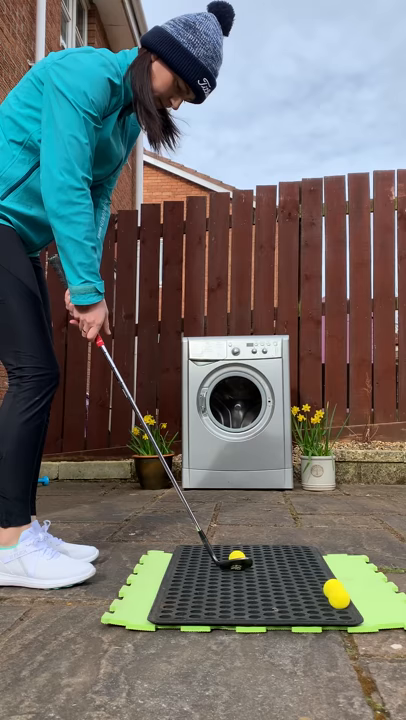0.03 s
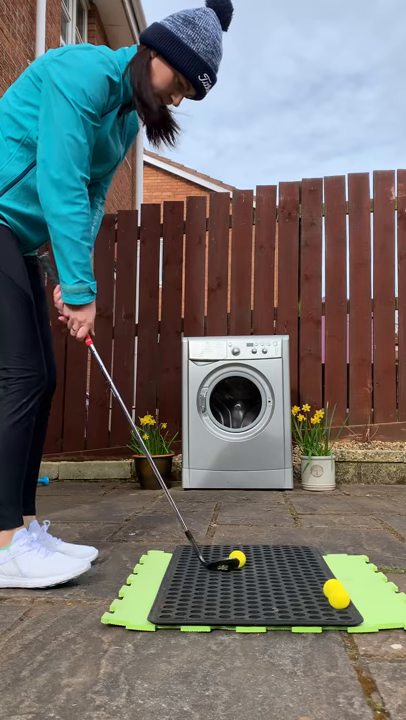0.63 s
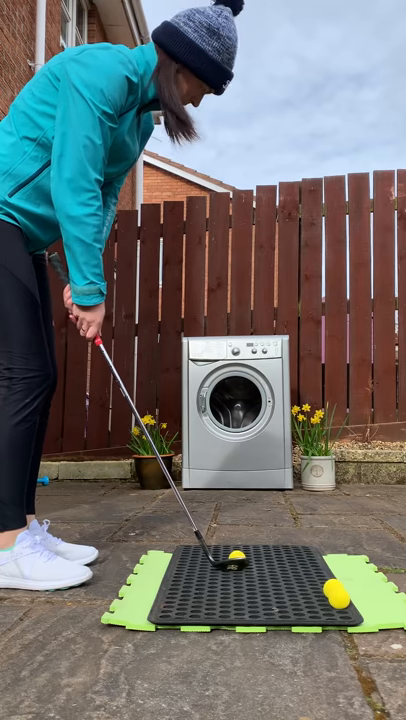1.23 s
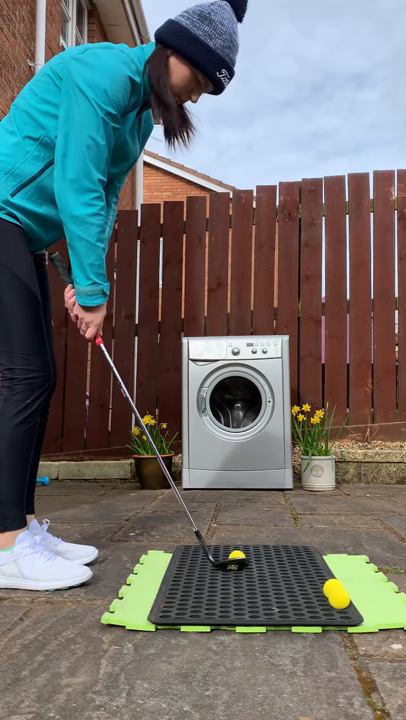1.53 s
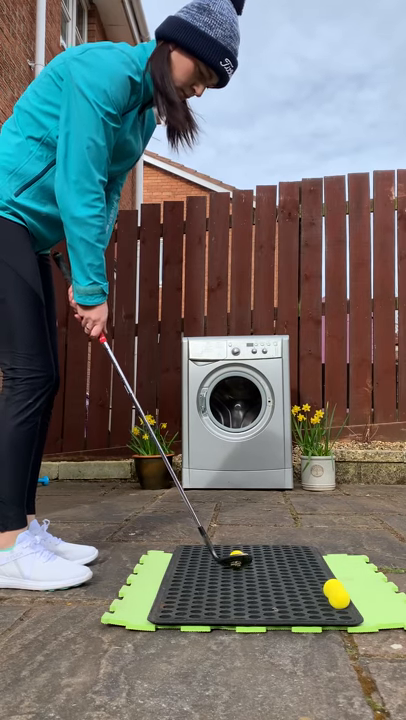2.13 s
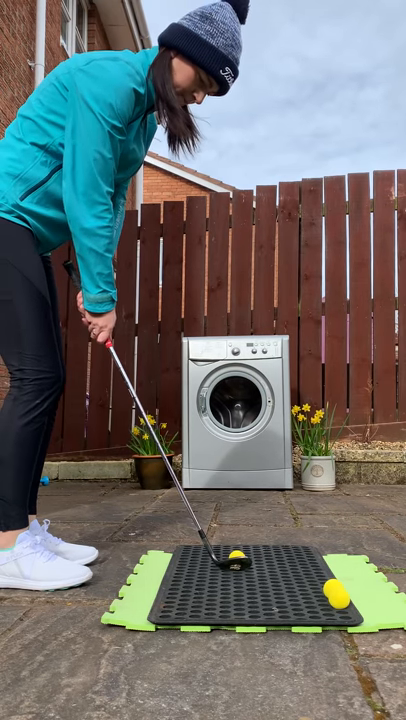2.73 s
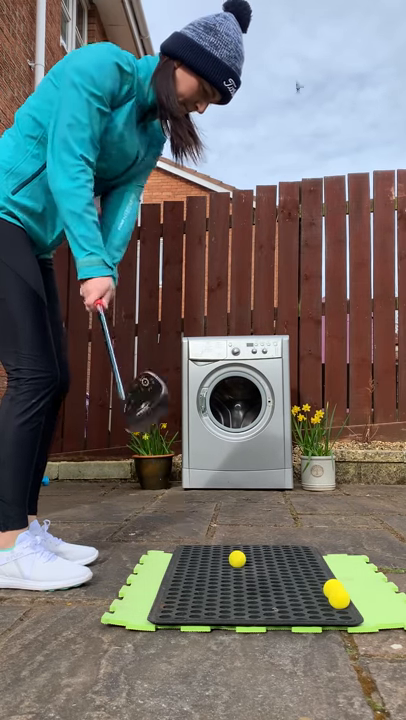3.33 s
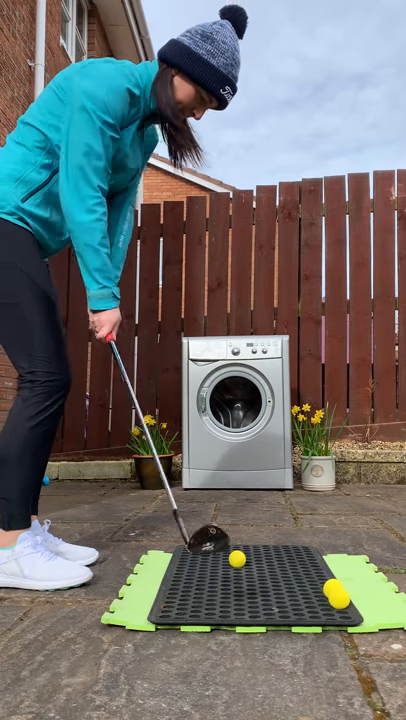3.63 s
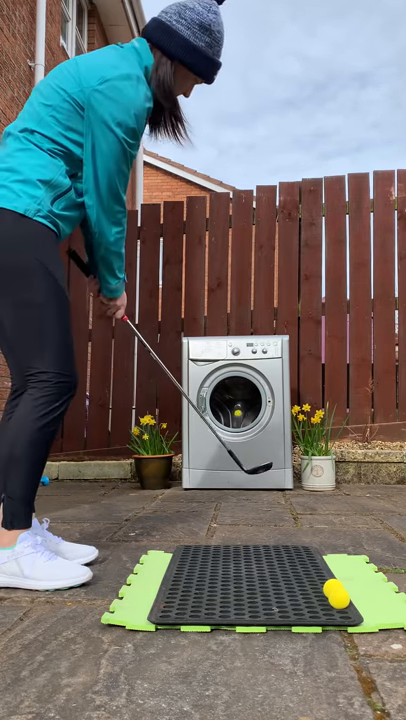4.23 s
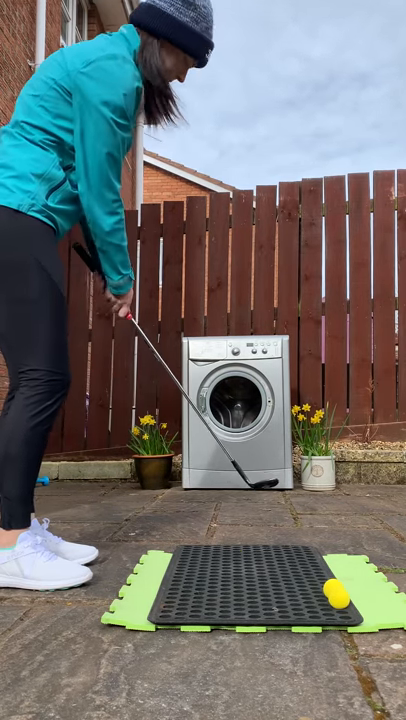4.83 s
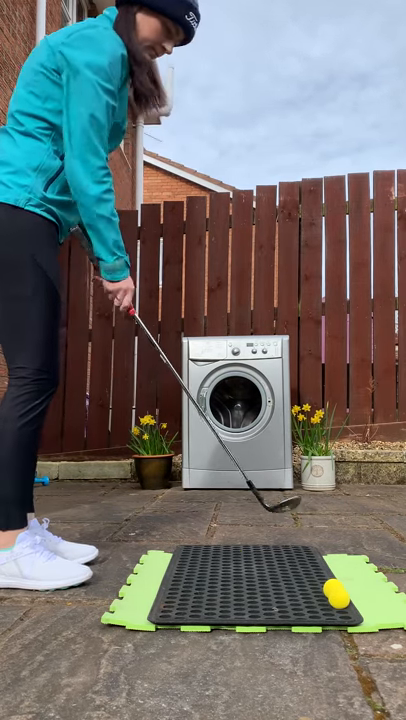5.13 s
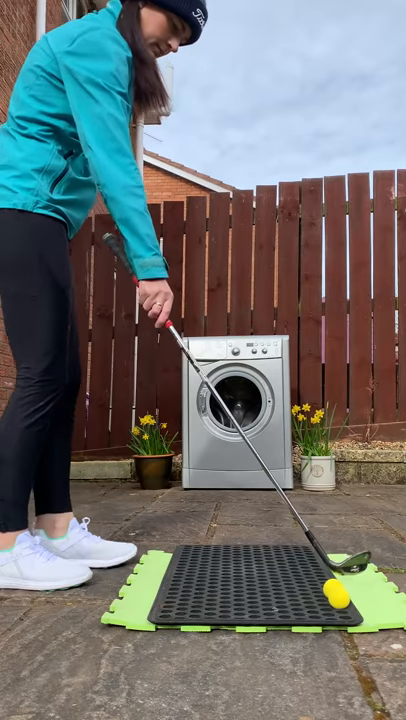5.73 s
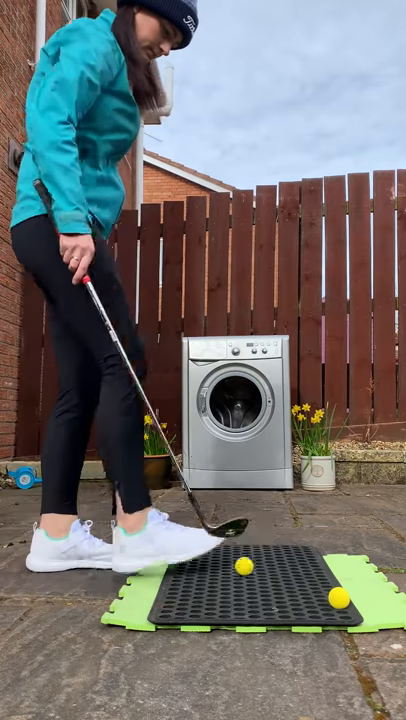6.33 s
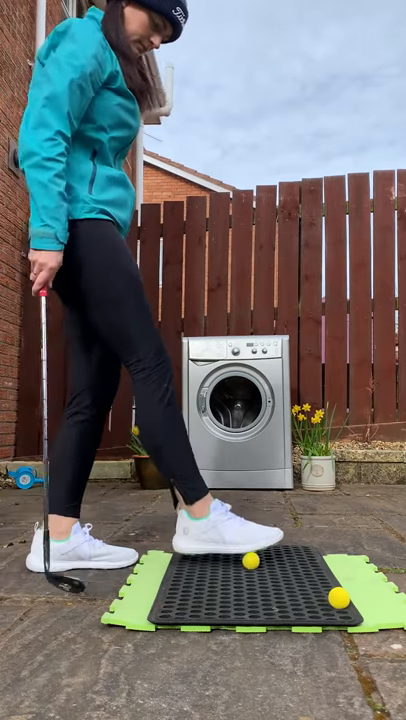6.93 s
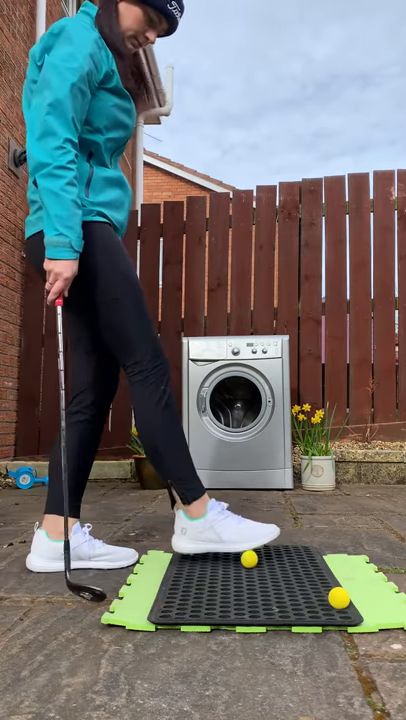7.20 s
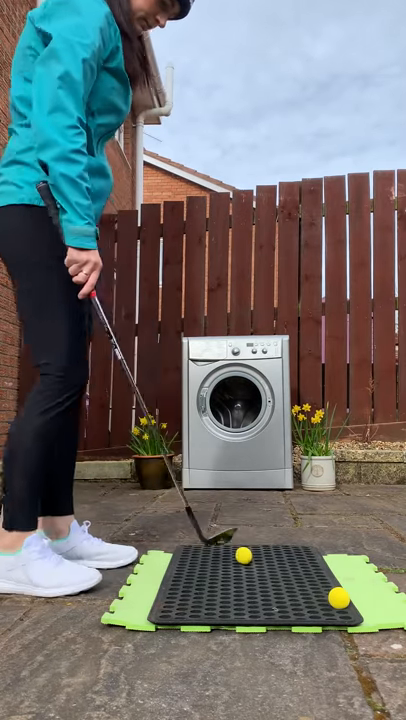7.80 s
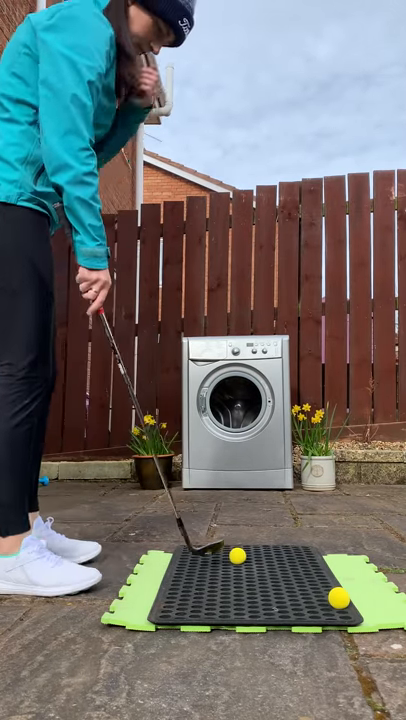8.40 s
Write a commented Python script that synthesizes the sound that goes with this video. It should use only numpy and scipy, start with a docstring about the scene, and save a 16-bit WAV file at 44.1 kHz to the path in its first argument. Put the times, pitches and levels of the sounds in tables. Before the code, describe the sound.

A steady low hum of distant traffic fills a fenced patio. In the first second a golf club taps down softly a few times, and sparrows chirp at about 0.5 and 1.8 seconds, with fainter birds farther off. A jacket swishes from around 3 seconds, and at 3.7 the club hits a ball with a sharp, dead click, followed by another chirp. At 4.3 the ball thuds into a washing machine drum; the steel rings and buzzes as the ball bounces and rattles to rest by about 5.3. Wind buffets the microphone with dull bumps at 5.5, then smaller puffs, and a sparrow chirps again. From 6 to 7.5 seconds come light club taps, faint grit under shoes and a sole rolling a ball over a rubber mat. The club clacks down at 7.7, cloth rustles, and a bird gives a slurred call at 8.5.

```python
"""A distant town hums behind a fenced patio; a golf club taps the ground and sparrows chirp.
A jacket swishes, and with a dead click a ball is chipped off a rubber mat into an open washing machine.
The tub thuds, the steel drum rings and buzzes, and the ball bounces and rattles to rest.
Puffs of wind buffet the microphone as the golfer rolls up another ball underfoot and sets the club down.
Knocks and birdsong scatter off the paving, the house and the fence."""
import sys
import numpy as np
from scipy import signal
from scipy.fft import rfft, irfft, next_fast_len
from scipy.io import wavfile
from scipy.ndimage import map_coordinates

SR = 44100
rng = np.random.default_rng(int(sys.argv[2]) if len(sys.argv) > 2 else 0)


def file_out(sig):
    """Save sig as 16-bit WAV at sys.argv[1]."""
    # one column per channel
    cols = np.atleast_2d(sig).T
    # limit, then scale
    lim = np.clip(cols, -1, 1)
    pcm = np.round(lim * 32767).astype(np.int16)
    wavfile.write(sys.argv[1], SR, pcm)


N = 377496

# The bed of distant traffic. Each row: frequency in Hz, level in dB.
TOWN_SPECTRUM = [(20, -40), (45, 0.5), (70, 2), (110, -1.5), (170, 3.5), (240, -5.5), (330, -16),
                 (600, -20.5), (1400, -20), (1800, -28), (2300, -20.5), (3000, -35), (4000, -38.5),
                 (6000, -45), (15000, -51.5)]
# Yard resonances that colour the hum. Each row: centre in Hz, width in Hz, level in dB.
YARD_RESONANCES = [(753, 20.5, 3), (937, 62, -0.5), (1375, 55, 1), (1546, 110, -4), (2088, 20, 2)]
# The tail off the fence. Each row: frequency in Hz, t60 in seconds.
FENCE_DECAY = [(150, 0.088), (600, 0.4), (2000, 0.73), (5000, 0.32), (14000, 0.022)]

# Chatter from other gardens. Each row: start and length in seconds, first and last pitch in Hz,
# level in dB, warble as a share of pitch.
FAR_CHIRPS = [(1.221, 0.17, 3130, 3000, -65, 0.049), (1.393, 0.21, 2940, 2670, -66.5, .11),
              (1.786, .22, 8640, 7500, -65.5, .03), (2.331, .1, 4170, 2410, -53.5, 0.078),
              (2.37, 0.02, 3950, 3860, -56, 0.0092), (2.482, .11, 3320, 2620, -58.5, .1),
              (2.751, 0.2, 3490, 3795, -55, 0.11), (2.938, 0.028, 3750, 3735, -50, .01),
              (6.559, 0.18, 7450, 7100, -71.5, .03), (6.816, .11, 5960, 5870, -64, .01)]
# One slurred call. Each row: time in seconds, pitch in Hz, level in dB, warble as a share of pitch.
SLUR_CONTOUR = [(8.4, 2950, -60, .04), (8.44, 3800, -52, 0.077), (8.475, 4110, -49, 0.052),
                (8.5, 3630, -50.5, 0.046), (8.53, 3080, -39, .015), (8.555, 3060, -53, .01)]
# Sparrow chirps. Each row: start of the high arch in seconds, its level in dB, pitch factor, then in dB
# against that arch: its overtones, the whistle, the low arch, the rasp, the hoarse voice.
SPARROW_CALLS = [(.457, -47, 1.02, -31, -3, -1, -9, -18), (1.766, -44.5, .98, -31, -6, -5, -7, -19),
                 (3.884, -41.5, .98, -34, -12, -4, -8, -21), (5.604, -42.5, 1.0, -20, -7, -2, -3, -8)]
# A chirp's four notes. Each lists: offset from the high arch and length in seconds,
# warble as a share of pitch, then evenly spaced pitches in Hz, before the pitch factor.
WHISTLE = (-.04, .04, .035, 4900, 5200, 5650, 6000)
HIGH_ARCH = (0, .038, .02, 3200, 4700, 5450, 5200, 5000, 4400, 3300)
LOW_ARCH = (.06, .032, .02, 3300, 3450, 4300, 3500, 2850)
RASP = (.088, .036, .08, 3650, 3550, 3400)

# Puffs on the microphone. Each row: arrival in seconds, level in dB, hold in seconds.
GUSTS = [(4.723, -43.5, 0.016), (5.474, -25.5, 0.036), (5.591, -37.5, 0.0084), (5.689, -41, .005),
         (5.856, -49, 0.0058), (6.013, -40, 0.014), (6.15, -35.5, 0.01), (6.268, -36, 0.019),
         (6.405, -38.5, 0.019), (6.468, -39.5, 0.012), (7.26, -40, 0.0075), (7.52, -43, 0.022)]
# Their rumble. Each row: frequency in Hz, level in dB.
WIND_SPECTRUM = [(15, -8), (35, -9), (60, 10), (90, 2), (160, -11), (300, -57), (700, -83)]
# Dull bumps in the strongest gust. Each row: start in seconds, level in dB, pitch in Hz.
GUST_BUMPS = [(5.466, -19, 184), (5.559, -21.5, 238)]

# Treble rustle through the swing and the steps after it, swelling with the hit and as the ball rolls. Each row:
# time in seconds, level in dB before trim.
SWING_RUB = [(2.3, -101), (2.668, -93), (2.96, -86), (3.11, -74), (3.26, -73.5), (3.35, -76.5),
             (3.45, -93.5), (3.58, -83.5), (3.754, -71.5), (4.07, -86), (4.25, -101)]
STEP_RUB = [(4.65, -100), (4.78, -84), (4.91, -73), (5.0, -74), (5.17, -77), (5.82, -89), (6.2, -83),
            (6.71, -99), (7.01, -84.5), (7.3, -92), (7.5, -83), (7.63, -81.5), (7.92, -77.5), (8.04, -75.5),
            (8.19, -82), (8.37, -72.5), (8.55, -75.5)]
# Grit ticking under the shoes. Each row: start in seconds, level in dB.
GRIT_TICKS = [(5.423, -65), (6.716, -60.5), (6.806, -52.5), (6.831, -58), (6.925, -53), (6.944, -54),
              (7.303, -64.5), (7.451, -56), (7.567, -58)]
# The sole scrapes a ball over the mat. Each row: start and length in seconds, level in dB.
SOLE_SCRAPES = [(6.722, 0.031, -74), (6.805, 0.12, -68.5), (6.924, 0.045, -71), (7.083, 0.16, -75.5),
                (7.291, .03, -72), (7.453, .04, -77)]
# The colours of cloth, grit and a contact's crack. Each row: frequency in Hz, level in dB.
CLOTH_SPECTRUM = [(800, 5.5), (2500, 1), (4000, 3.5), (6500, -3.5), (10000, -9.5), (15500, -11)]
GRIT_SPECTRUM = [(1500, -11), (3500, -4), (7000, 0.5), (14000, 2.5), (16000, -9)]
CRACK_SPECTRUM = [(100, -15), (400, 22.5), (2300, 5.5), (3500, -9), (7000, -2.5), (10000, -12),
                  (15500, -20)]

# The club head touches down. Each row: start in seconds, level in dB, tilt in dB per octave, crack in dB.
HEAD_TAPS = [(.147, -42, -5, -55.5), (.321, -43, 2.5, -61), (.722, -50.5, -6, -55.5),
             (6.389, -40.5, -2, -56), (7.06, -52.5, 10.5, -58), (7.6838, -23.5, 0, -35.5)]
# The head's dead modes on the ground. Each row: pitch in Hz, level in dB, t60 in seconds.
HEAD_MODES = [(396, -2, 0.056), (754, 3, 0.025), (1170, 0, 0.016), (1560, 2.5, 0.012), (2030, -6, 0.014),
              (3390, -26, 0.038)]
# The club meets ball, mat and ground. Each row: start in seconds, level in dB, pitch in Hz,
# t60 in seconds, crack in dB.
CLUB_KNOCKS = [(3.7449, -25, 1600, 0.026, -49), (3.7493, -20, 1380, 0.003, -31.5),
               (3.7501, -2, 795, 0.0042, -31.5), (3.7512, -29, 167, 0.063, -52),
               (3.7552, -28, 605, 0.02, -57), (3.7608, -28, 1160, 0.0067, -39),
               (3.7655, -30, 1860, 0.0087, -55), (6.015, -25, 470, 0.0039, -61),
               (7.6843, -20, 1120, 0.0045, -41), (7.6892, -26, 3660, 0.0041, -39)]

# The ball hits the drum. Each row: start in seconds, thud, steel and buzz levels in dB,
# then the struck panel's pitch in Hz, level in dB and t60 in seconds.
BOUNCES = [(4.302, -6.5, -29.5, -44, 643, -20, 0.076), (4.334, -47, -29, -37, 862, -17.5, 0.071),
           (4.349, -48, -28.5, -35.5, 1278, -34.5, .17), (4.399, -47, -40, -56, 774, -27, 0.1),
           (4.465, -55, -31.5, -50.5, 1030, -22.5, 0.031), (4.492, -52, -58, -61, 390, -30.5, 0.1),
           (4.497, -60, -51, -75, 756, -35, 0.32), (4.545, -54, -43, -63, 752, -37, .1),
           (4.805, -35.5, -43, -67, 823, -36, 0.054), (4.861, -57, -42, -70, 781, -37.5, 0.13),
           (4.921, -53, -36.5, -38.5, 858, -45, .15), (5.048, -51, -36.5, -53.5, 1060, -36.5, 0.043)]
# The damped tub and the ringing steel drum. Each row: pitch in Hz, level in dB, t60 in seconds.
TUB_MODES = [(439, -5, 0.1), (477, -12.5, 0.1), (563, -9, 0.062), (610, -3, 0.092), (758, -8.5, 0.08),
             (791, -12.5, 0.049), (867, -16, 0.13), (1010, -15, .07), (1077, -16.5, 0.14),
             (1210, -14, 0.071)]
STEEL_MODES = [(298, -1, 1.3), (371, -7, 1.7), (412, -7, .6), (442, -5, 1.0), (495, -8, .5), (557, -7, 1.0),
               (600, -6, .45), (690, -9, .7), (762, -6, .8), (864, -5, .7), (996, -8, .95), (1058, -7, .55),
               (1228, -9, .5), (1275, -9, .4), (1728, -19, .45), (2035, -13, .5), (2099, -16, .7),
               (2762, -23, .5)]
# The colours of the shell's clatter and of loose steel buzzing. Each row: frequency in Hz, level in dB.
CLATTER_SPECTRUM = [(150, -41), (300, 2), (450, -1), (800, -6.5), (1150, -12), (1450, -22), (3000, -24.5),
                    (6000, -77)]
BUZZ_SPECTRUM = [(200, -22), (600, 6.5), (1200, 11.5), (1600, -5), (2100, 2.5), (2700, 2), (3800, -3.5),
                 (6000, -7), (10500, -13), (15500, -21)]

PURE_DB = -43  # overtones of a clean bird note
HOARSE_PITCH, HOARSE_WARBLE = .66, .08  # shares of pitch
GUST_RISE_DB_PER_S, GUST_FALL_DB_PER_S = 387, 224
JACKET_TRIM_DB = 15.5
RING_DB, SHIMMER_DB, ENTRY_CRACK_DB = -13.5, -21, -33.5
ROLL_START_S, ROLL_LENGTH_S, ROLL_DB = 4.74, 0.6, -51
TOWN_PAN, MACHINE_PAN = 0.077, -.04  # share sent to the side channel, left positive
WIDEN_S, WIDEN_FROM_HZ, WIDEN_KNEE_HZ = .000235, 2600, 700
LEAD_SILENCE_S, TOP_HZ = .072, 15900


def amp(db):
    """Decibels to gain."""
    return 10 ** (np.asarray(db) / 20)


def unit(x):
    """Scale to rms 1."""
    return x / np.sqrt(np.mean(x ** 2) + 1e-20)


def seconds(length):
    """A time axis."""
    return np.arange(int(length * SR)) / SR


def along(points, hz):
    """Read a curve of (Hz, value) points on a log frequency axis."""
    f, v = np.transpose(points)
    return np.interp(np.log(hz + 1), np.log(f + 1), v)


def filtered(x, response):
    """EQ a sound with a gain given as a function of frequency."""
    n = x.shape[-1]
    padded = next_fast_len(n + 8192)
    return irfft(rfft(x, padded) * response(np.fft.rfftfreq(padded, 1 / SR)), padded)[..., :n]


def noise(spectrum, size):
    """Coloured noise of rms 1."""
    return unit(filtered(rng.standard_normal(size), lambda hz: amp(along(spectrum, hz))))


def wobble(rate, size):
    """A smooth random curve, rate knots a second."""
    knots = rng.standard_normal(int(size * rate / SR) + 4)
    return map_coordinates(knots, [np.arange(size) * rate / SR])


def add(track, s, sound):
    """Mix a sound into a track at s seconds."""
    part = track[max(round(s * SR), 0):][:len(sound)]
    part += sound[:len(part)]


def fade(t, rise, t60):
    """A quick attack and an exponential decay, both timed in seconds."""
    return (1 - np.exp(-t / rise)) * np.exp(-np.log(1000) * t / t60)


def ring(modes, t, rise, detune=0):
    """Decaying modes; detune lets each blow pull them slightly off pitch."""
    out = np.zeros(len(t))
    for hz, db, t60 in modes:
        pitch = hz * (1 + detune * rng.standard_normal())
        out += amp(db) * fade(t, rise, t60) * np.sin(2 * np.pi * pitch * t)
    return out


def crack(t, rise, t60):
    """The burst of noise on the front of a hard contact."""
    return fade(t, rise, t60) * noise(CRACK_SPECTRUM, len(t))


def radiated(x, corner_hz):
    """A small body radiates little bass."""
    return signal.sosfilt(signal.butter(2, corner_hz, "high", fs=SR, output="sos"), x)


def echo(x, delay_s, db):
    """One clean reflection."""
    return amp(db) * np.pad(x, (int(delay_s * SR), 0))[:N]


def patio(x, fence_s, fence_db):
    """Scatter from paving and house, then a second wave back from the fence."""
    hz, t, grains = signal.stft(rng.standard_normal(SR // 2), SR, nperseg=256)
    near = np.exp(-np.log(1000) * t / 0.12)
    since_fence = np.maximum(t - fence_s, 0)
    far = amp(fence_db) * fade(since_fence, rise=0.0059, t60=along(FENCE_DECAY, hz)[:, None])
    tail = signal.istft(grains * (near + far), SR, nperseg=256)[1]
    predelayed = np.pad(tail / np.linalg.norm(tail), (int(.003 * SR), 0))
    return signal.fftconvolve(x, predelayed)[:N]


def town():
    """A steady bed of distant traffic, coloured by the walls of the yard."""
    drift = amp(.4 * wobble(3, N) + .8 * wobble(14, N))
    traffic = amp(-50) * drift * noise(TOWN_SPECTRUM, N)
    walls = lambda f: sum(amp(db) / (1 + (2 * (f - hz) / width) ** 2)
                          for hz, width, db in YARD_RESONANCES)
    return traffic + amp(-63.5) * unit(filtered(rng.standard_normal(N), walls))


def bird_note(hz, overtone_db, warble):
    """One warbling note that swells and fades along a pitch contour."""
    pitch = hz * (1 + warble * wobble(500, len(hz)))
    phase = 2 * np.pi * np.cumsum(pitch) / SR
    swell = np.sqrt(np.abs(np.sin(np.linspace(0, np.pi, len(hz)))))
    return swell * (np.sin(phase) + amp(overtone_db) * (np.sin(2 * phase) + np.sin(3 * phase)))


def far_birds():
    """Rough chatter and thin whistles from other gardens, each sliding in pitch."""
    out = np.zeros(N)
    for s, length, first_hz, last_hz, db, warble in FAR_CHIRPS:
        contour = np.linspace(first_hz, last_hz, len(seconds(length)))
        add(out, s, amp(db) * bird_note(contour, PURE_DB, warble))
    return out


def slurred_call():
    """A nearer bird climbs rough, then falls to a louder, clearer note."""
    out = np.zeros(N)
    s, hz, db, warble = np.transpose(SLUR_CONTOUR)
    t = s[0] + seconds(s[-1] - s[0])
    voice = bird_note(np.interp(t, s, hz), PURE_DB, np.interp(t, s, warble))
    add(out, s[0], amp(np.interp(t, s, db)) * voice)
    return out


def sparrow():
    """A close chirp: a buzzy rising whistle, two arches that flick down and a trailing rasp."""
    out = np.zeros(N)
    for s, db, pitch, overtone_db, whistle_db, low_db, rasp_db, hoarse_db in SPARROW_CALLS:
        notes = [(WHISTLE, whistle_db, PURE_DB), (HIGH_ARCH, 0, overtone_db),
                 (LOW_ARCH, low_db, PURE_DB), (RASP, rasp_db, PURE_DB)]
        for note, note_db, bright_db in notes:
            after_s, length, warble, *turns_hz = note
            t = seconds(length)
            contour = pitch * np.interp(t, np.linspace(0, length, len(turns_hz)), turns_hz)
            flutter = amp(2.5 * wobble(200, len(t)))
            add(out, s + after_s, amp(db + note_db) * flutter * bird_note(contour, bright_db, warble))
            if note is HIGH_ARCH:  # a hoarse, lower voice sounds underneath
                hoarse = bird_note(HOARSE_PITCH * contour, bright_db, HOARSE_WARBLE)
                add(out, s, amp(db + hoarse_db) * hoarse)
    return out


def wind():
    """Low rumble on the microphone: each puff rises fast, holds and dies away."""
    strength = np.zeros(N)
    for s, db, hold_s in GUSTS:
        t = np.arange(N) / SR - s
        attack_db = GUST_RISE_DB_PER_S * np.minimum(t, 0)
        release_db = -GUST_FALL_DB_PER_S * np.maximum(t - hold_s, 0)
        strength += amp(np.maximum(db + attack_db + release_db, -150))
    return strength * amp(1.46 * wobble(70, N)) * noise(WIND_SPECTRUM, N)


def gust_bumps():
    """Short, muffled thumps at the microphone in the strongest gust."""
    out, t = np.zeros(N), seconds(.2)
    for s, db, hz in GUST_BUMPS:
        add(out, s, amp(db) * ring([(hz, 0, 0.019)], t, rise=0.00047, detune=0.02))
    return signal.sosfilt(signal.butter(4, 480, fs=SR, output="sos"), out)


def jacket():
    """Cloth rubs and swishes with each move, and the treble swells with the hit and the ball's roll."""
    rub_db = np.interp(np.arange(N) / SR, *np.vstack([SWING_RUB, STEP_RUB]).T)
    return amp(JACKET_TRIM_DB + rub_db + 1.13 * wobble(70, N)) * noise(CLOTH_SPECTRUM, N)


def shoes():
    """Grit ticks underfoot, and a sole scrapes the next ball over the mat."""
    out, t = np.zeros(N), seconds(.09)
    for s, db in GRIT_TICKS:
        crunch = amp(db + 4.2 * wobble(670, len(t)))
        add(out, s, crunch * fade(t, rise=.0004, t60=0.022) * noise(GRIT_SPECTRUM, len(t)))
    for s, length, db in SOLE_SCRAPES:
        size = len(seconds(length))
        grains = unit(amp(5 * wobble(500, size)) * noise(GRIT_SPECTRUM, size))
        add(out, s, amp(db) * signal.get_window(("tukey", .5), size) * grains)
    return out


def club_taps():
    """Each touch of the club head rings the same dead modes, brighter on harder ground."""
    out, t = np.zeros(N), seconds(0.26)
    pivot_hz = HEAD_MODES[1][0]
    for s, db, tilt_db, crack_db in HEAD_TAPS:
        modes = [(hz, level + tilt_db * np.log2(hz / pivot_hz), t60) for hz, level, t60 in HEAD_MODES]
        add(out, s, amp(db) * ring(modes, t, rise=0.0012, detune=0.02))
        add(out, s, amp(crack_db) * crack(t, rise=0.00011, t60=0.081))
    return out


def club_knocks():
    """Dead contacts with ball, mat and ground: one heavily damped resonance and a short crack."""
    out, t = np.zeros(N), seconds(.2)
    for s, db, hz, t60, crack_db in CLUB_KNOCKS:
        add(out, s, amp(db) * ring([(hz, 0, t60)], t, rise=0.00029))
        add(out, s, amp(crack_db) * crack(t, rise=0.00017, t60=0.047))
    return out


def ball_roll():
    """Through its last bounces the ball rolls over the drum's perforations with a fine rattle."""
    out, t = np.zeros(N), seconds(ROLL_LENGTH_S)
    swell = np.sin(np.pi * t / ROLL_LENGTH_S)
    rattle = amp(ROLL_DB + 2.1 * wobble(90.4, len(t))) * noise(CLATTER_SPECTRUM, len(t))
    add(out, ROLL_START_S, swell * rattle)
    return out


def drum_hits():
    """Each bounce sounds a panel, thumps the tub and rings the drum; hard ones set loose steel buzzing."""
    tub, out, t = np.zeros(N), np.zeros(N), seconds(1.2)
    thump = ring(TUB_MODES, t, rise=.0005)
    # the shell's dense modes die fast, but for a faint long shimmer
    shell_fade = fade(t, rise=.001, t60=.09) + amp(SHIMMER_DB) * fade(t, rise=.03, t60=1.1)
    for s, thud_db, steel_db, buzz_db, panel_hz, panel_db, panel_t60 in BOUNCES:
        panel = amp(panel_db) * ring([(panel_hz, 0, panel_t60)], t, rise=.002)
        steel = amp(steel_db + RING_DB) * ring(STEEL_MODES, t, rise=.012, detune=.003)
        clatter = amp(steel_db + 0.95 * wobble(110, len(t))) * noise(CLATTER_SPECTRUM, len(t))
        buzz = amp(buzz_db + 0.85 * wobble(250, len(t))) * noise(BUZZ_SPECTRUM, len(t))
        add(out, s, panel + steel + shell_fade * clatter + fade(t, rise=0.0016, t60=0.31) * buzz)
        add(tub, s, amp(thud_db) * thump)
    # a sharp crack as the ball first meets the steel
    add(out, BOUNCES[0][0], amp(ENTRY_CRACK_DB) * crack(t, rise=0.00015, t60=0.057))
    # the tub's thud is held to its mids, falling steeply on either side
    return out + signal.sosfilt(signal.butter(3, (390, 1000), "band", fs=SR, output="sos"), tub)


def scene():
    """A mid/side mix: club, machine and near birds get patio reverb; the far birds are all reverb."""
    club = radiated(club_knocks() + club_taps(), corner_hz=151)
    machine = radiated(drum_hits() + ball_roll(), corner_hz=238)
    birds = sparrow() + slurred_call()
    hum = town()
    # the slats of the fence throw back mostly treble
    slats = filtered(echo(club, delay_s=0.024, db=5.0), lambda hz: hz ** 2 / (hz ** 2 + 3500 ** 2))
    mid = club + amp(-8) * patio(club + slats, fence_s=.04, fence_db=-21)
    mid += machine + amp(-16) * patio(machine, fence_s=.04, fence_db=-4)
    mid += birds + echo(birds, delay_s=.027, db=-12)
    mid += amp(-4.5) * patio(birds, fence_s=.025, fence_db=-4)
    mid += patio(far_birds(), fence_s=0.06, fence_db=-10.5)
    mid += jacket() + shoes() + wind() + gust_bumps() + hum
    # hum, wind and knocks get their width in the lows and mids only
    side = amp(-10) * town() + amp(-14) * wind()
    side += amp(-9) * patio(club + machine, fence_s=.04, fence_db=-20)
    side += TOWN_PAN * hum + MACHINE_PAN * machine
    side = filtered(side, lambda hz: 1 / (1 + (hz / 2800) ** 4))
    # the birds' echoes come from all around
    side += amp(-9) * patio(birds, fence_s=.025, fence_db=-8)
    return np.array([mid + side, mid - side])


def record(dry):
    """A moment of silence, then the sound fades in; the right treble lags for width, the top is cut."""
    def response(hz):
        above_hz = WIDEN_KNEE_HZ * np.logaddexp(0, (hz - WIDEN_FROM_HZ) / WIDEN_KNEE_HZ)
        phase_gap = 2 * np.pi * WIDEN_S * above_hz
        return np.exp(.5j * np.array([phase_gap, -phase_gap])) * (hz < TOP_HZ)

    fade_in = np.clip((np.arange(N) / SR - LEAD_SILENCE_S) / .004, 0, 1)
    return filtered(dry * fade_in, response)


dry = scene()
out = record(dry)
file_out(out)
```